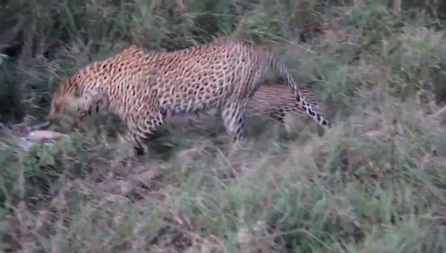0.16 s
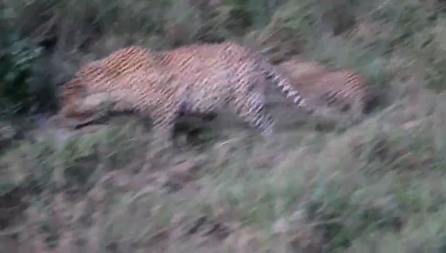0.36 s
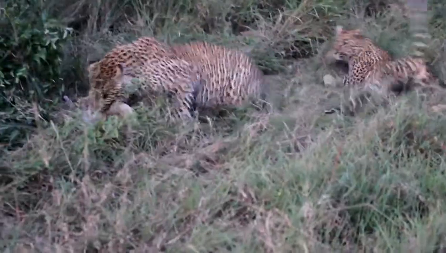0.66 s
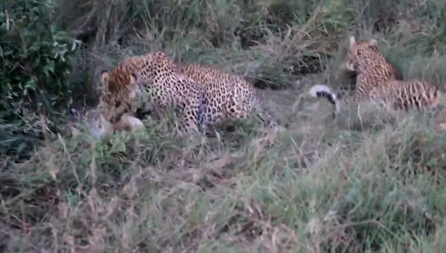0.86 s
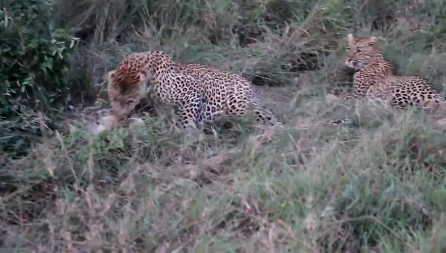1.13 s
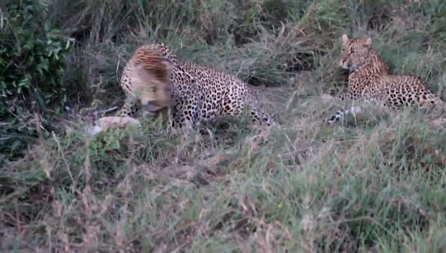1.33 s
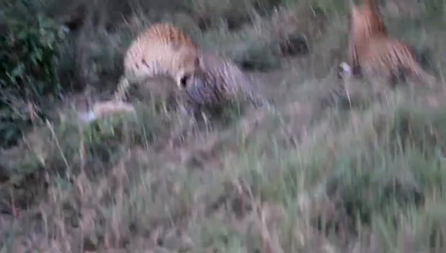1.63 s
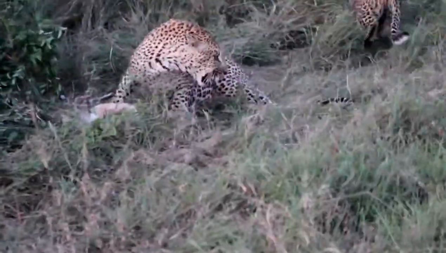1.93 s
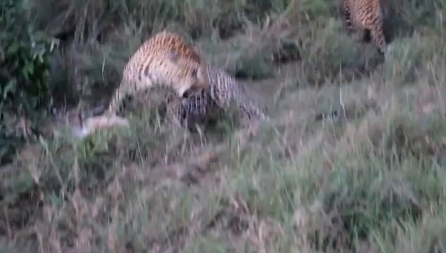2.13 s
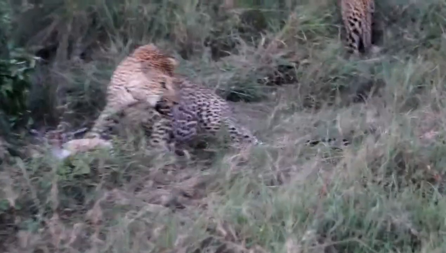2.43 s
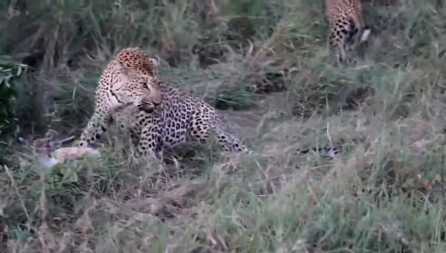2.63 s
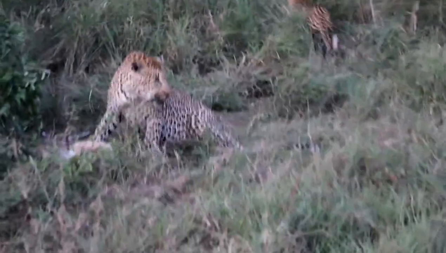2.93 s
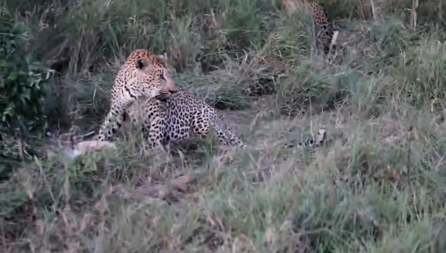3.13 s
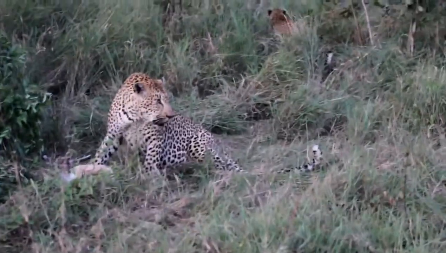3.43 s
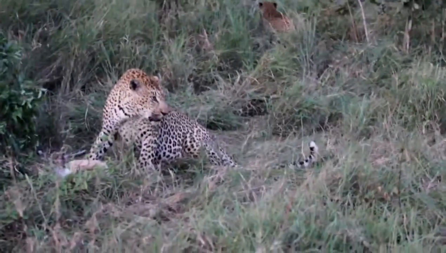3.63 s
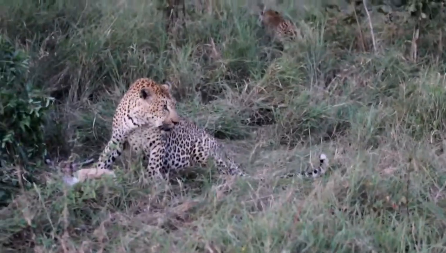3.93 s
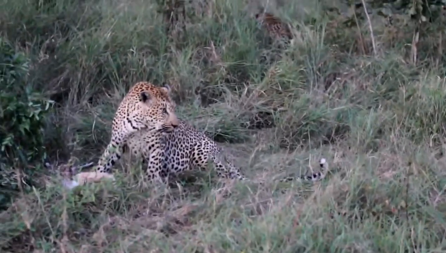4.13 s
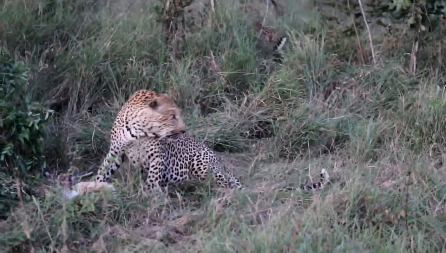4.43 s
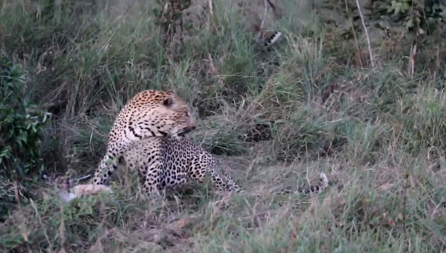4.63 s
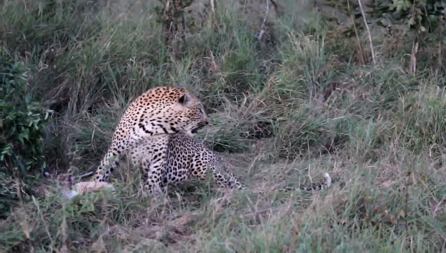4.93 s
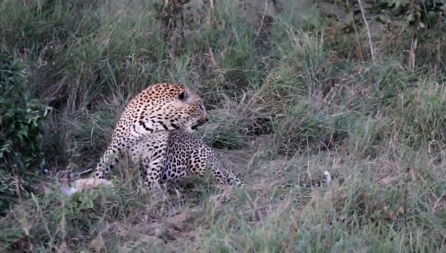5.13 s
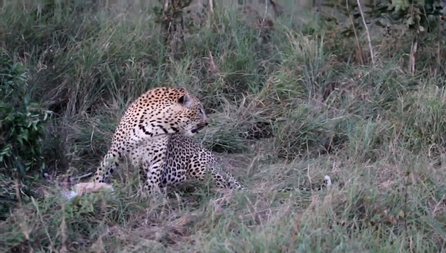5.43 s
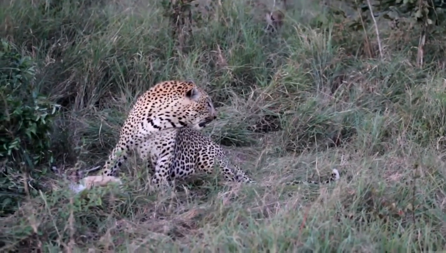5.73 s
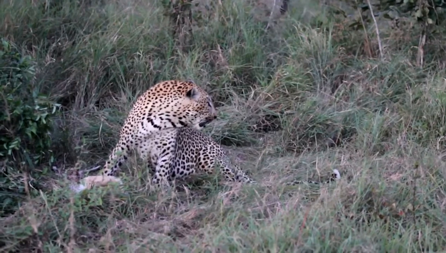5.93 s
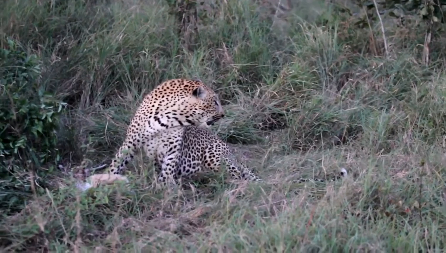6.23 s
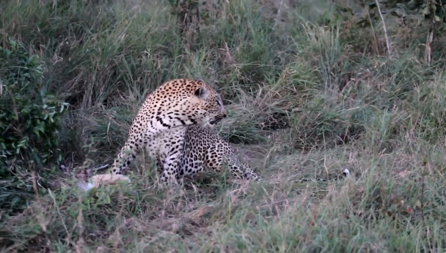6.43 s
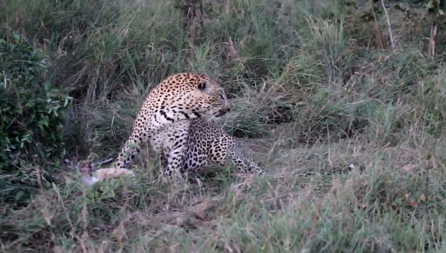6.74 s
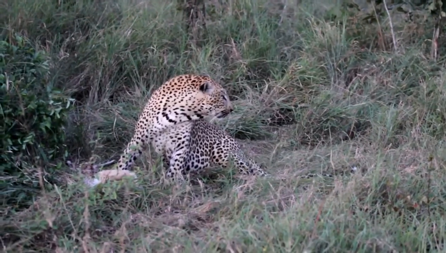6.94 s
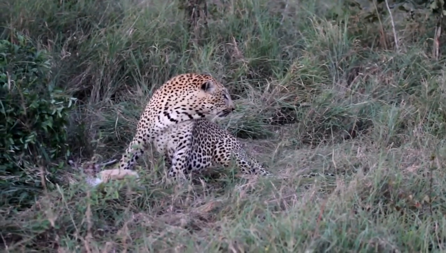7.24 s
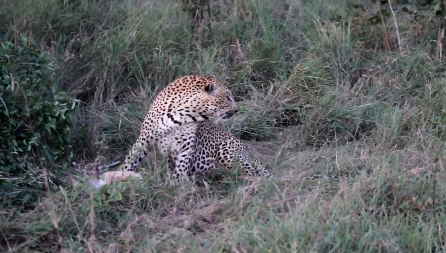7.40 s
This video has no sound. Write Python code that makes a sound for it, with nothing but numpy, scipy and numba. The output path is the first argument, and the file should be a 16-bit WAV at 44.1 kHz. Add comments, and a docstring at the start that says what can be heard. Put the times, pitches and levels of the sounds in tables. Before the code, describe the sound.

Outdoors in long grass, big cats clash with a quick run of loud snarls, spitting hisses and chesty growls. The outburst soon eases into low, throaty rattles with pauses between them, fading until they stop. Grass swishes softly as the animals move, and several dry stalks crack toward the end, leaving only faint open air.

```python
"""Leopards fighting in long grass

Two leopards growl and snarl at each other, then one grumbles on in slow, fading rattles. Slack vocal
folds slap shut tens of times a second: each slap booms in the chest and rasps through the mouth. In
the snarls the folds also flutter and air hisses past the teeth. Grass rustles, a few dry stalks snap
and one faint chirp sounds; the bushes add a short, dull echo."""
import sys
import numpy as np
from scipy import signal
from scipy.fft import rfft, irfft, next_fast_len
from scipy.io import wavfile
from scipy.ndimage import uniform_filter1d, map_coordinates
from numba import njit

SR = 44100
rng = np.random.default_rng(int(sys.argv[2]) if len(sys.argv) > 2 else 0)


def to_wav(s):
    """Save 16-bit WAV."""
    ch = np.atleast_2d(s).T  # columns
    pcm = np.round(np.clip(ch, -1, 1) * 32767)  # PCM
    wavfile.write(sys.argv[1], SR, pcm.astype(np.int16))


N = 333748
TIME = np.arange(N) / SR
TOP_HZ = 15900
SNARL_ATTACK_S, SNARL_RELEASE_S = 0.013, 0.026
FLUTTER, ROAR, HISS = 2, 3, 4  # level columns of the snarls in forced_air()

# the throat, slack in the fight and narrowed for the grumbling:
# (time [s], chest resonance [Hz], pharynx resonance [Hz])
THROAT = [(.15, 114, 473), (.3, 110, 262), (.39, 111, 380), (.5, 127, 333), (.65, 141, 257),
          (1.05, 105, 260), (1.28, 140, 230), (1.52, 123, 445), (1.85, 111, 310), (2.08, 119, 267),
          (2.24, 114, 399), (2.45, 101, 414), (2.72, 163.6, 428), (3.5, 150.6, 316), (3.85, 159.7, 417),
          (4.9, 171, 450)]
# hard slaps of the folds that stand out alone: (time [s], boom [dB], clack [dB])
LONE_SLAPS = [(.303, -29, -26), (.486, -38, -16), (.513, -29, -15.5), (0.909, -26.5, -31),
              (1.213, -30.5, -33), (1.786, -30, -33), (1.832, -40, -19.5), (1.871, -33.5, -19.5),
              (2.076, -44, -21.5), (2.704, -44, -24.5), (3.746, -45, -25.5), (4.948, -35, -26.5)]


def undb(db):
    return 10 ** (np.asarray(db) / 20)


def unit(x):
    return x / np.std(x)


def noise():
    return rng.standard_normal(N)


def track(table, column):
    """One column of an automation table at every sample."""
    rows = np.array(table)
    return np.interp(TIME, rows[:, 0], rows[:, column])


def walk(per_s):
    """Smooth random drift with a spread of 1."""
    hold = int(SR / per_s)
    steps = np.repeat(rng.standard_normal(N // hold + 1), hold)
    return unit(uniform_filter1d(uniform_filter1d(steps, hold), hold)[:N])


def colour(x, points):
    """EQ a sound through (frequency [Hz], level [dB]) points, at rms 1."""
    hz, db = np.transpose(points)
    size = next_fast_len(N, real=True)
    bins = np.maximum(np.fft.rfftfreq(size, 1 / SR), 1)
    gain = undb(np.interp(np.log(bins), np.log(hz), db))
    return unit(irfft(rfft(x, size) * gain, size)[:N])


def cut(x, hz, kind, order=2):
    return signal.sosfilt(signal.butter(order, hz, kind, fs=SR, output="sos"), x)


def strikes(times, db):
    """One impulse for each event."""
    out = np.zeros(N)
    np.add.at(out, np.clip((times * SR).astype(int), 0, N - 1), undb(db))
    return out


def fade(x, seconds):
    """Each impulse becomes an exponential decay."""
    return signal.lfilter([1], [1, -np.exp(-1 / (seconds * SR))], x)


def swell(middle_s, half_width_s):
    """A bell-shaped envelope."""
    return np.exp(-np.minimum(((TIME - middle_s) / half_width_s) ** 2, 20))


@njit
def ring(x, hz, width):
    """A resonance whose centre moves; an impulse of 1 rings with amplitude 1."""
    out, z, pole = np.empty(len(x), np.complex128), 0j, 0j
    for i in range(len(x)):
        if i % 16 == 0:
            pole = np.exp(np.pi * (2j * hz[i] - width) / SR)
        z = z * pole + x[i] + 1e-18
        out[i] = z
    return out


def formant(x, hz, width):
    """Band-pass with gain 1 at its moving centre."""
    return ring(x, hz, float(width)).real * 2 * np.pi * width / SR


def still_air():
    """A quiet, bass-heavy bed of outdoor air."""
    # tone of the air: (frequency [Hz], level [dB])
    air_eq = [(20, -56), (47, 1), (70, 1.5), (100, -5.5), (400, -13.5), (1500, -14.5), (16000, -27)]
    return undb(-57) * colour(noise(), air_eq)


def grass(grain_db=3.0):
    """Countless tiny scrapes merge into a high rustle that swells as the cats move."""
    # tone of the rustle: (frequency [Hz], level [dB])
    rustle_eq = [(300, -2), (1600, -1.5), (7000, -4.5), (12500, 0.5), (14500, -1.5), (16000, -11.5)]
    # the rustle between moves dies down as the cats settle: (time [s], level [dB])
    stirring = [(6.55, -53.5), (6.95, -59.5), (7.4, -63)]
    # moves through the grass: (middle [s], half width [s], level [dB])
    swishes = [(0.2, 0.046, -42.5), (0.55, 0.18, -40), (1.78, 0.53, -47), (2.42, 0.23, -51),
               (3.202, 0.28, -53.5), (4.26, 0.055, -50.5), (5.0, 0.36, -49.5), (5.328, 0.015, -45),
               (7.17, 0.067, -52)]
    power = undb(track(stirring, 1)) ** 2
    for middle, half_width, db in swishes:
        power += undb(db) ** 2 * swell(middle, half_width)
    grains = noise() * undb(grain_db * np.minimum(rng.exponential(size=N), 6))
    flicker = undb(1.1 * walk(25) + .8 * walk(7))
    return undb(-0.5) * colour(grains, rustle_eq) * np.sqrt(power) * flicker


def chirp(middle_s=4.785, half_width_s=.02, hz=3680, db=-48):
    """One faint, raspy chirp, perhaps a small bird far off."""
    band = colour(noise(), [(hz * .8, -30), (hz, 0), (hz * 1.2, -30)])
    return undb(db) * swell(middle_s, half_width_s) * band


def stalks():
    """A stalk snaps, then the blades around it crunch in a brief spray of tiny cracks."""
    # dry snaps, duller where the grass covers them: (time [s], level [dB], low-pass [Hz])
    snaps = [(4.568, -23.5, 5000), (5.093, -23, 9380), (6.684, -29, 14500), (7.154, -29.5, 14500),
             (7.249, -26.5, 11000), (7.269, -24.5, 15500)]
    crack = noise()
    spray = unit(noise() * undb(2 * np.clip(walk(400), -2, 2)))
    out = 0
    for time, db, top_hz in snaps:
        snap = strikes(np.array([time]), db)
        sound = undb(-4.5) * crack * fade(snap, .0014) + undb(-15) * spray * fade(snap, .02)
        out = out + cut(sound, top_hz, "low")
    return cut(out, 2000, "high", order=1)


def bushes(x, t60_s=0.17, predelay_s=.008, wet_db=-16):
    """The bank and bushes scatter a short, dull echo."""
    t = TIME[:SR // 2]
    tail = cut(noise()[:len(t)], 4500, "low") * undb(-60 * t / t60_s) * (t > predelay_s)
    tail = cut(tail, 164, "high")
    return x + undb(wet_db) * signal.fftconvolve(x, tail / np.linalg.norm(tail))[:N]


def steady(x):
    """Even out the power over about 30 ms: the lungs keep up their pressure whatever the folds do."""
    power = uniform_filter1d(uniform_filter1d(x ** 2, SR // 33), SR // 66)
    return x / np.sqrt(power + np.var(x) / 20)


def soften(x, rise_s=.0045):
    """Round the attack of each puff: turbulence takes time to build as the folds part."""
    return uniform_filter1d(x, int(rise_s * SR))


def arch(share, strongest, fade_db):
    """Effort in dB along one call, down by fade_db one call length from the strongest point."""
    return -fade_db * (share - strongest) ** 2


def forced_air(column):
    """Envelope of flutter, roar or hiss: each snarl has a quick attack, an arch and a release."""
    # snarls, each one push of air: (start [s], length [s], flutter [dB], roar [dB], hiss [dB],
    # strongest point [0-1], fade one length away [dB])
    snarls = [(-.02, 0.25, -33, -39.5, -46, 0.52, 23), (0.258, 0.16, -29.5, -36.5, -43.5, 0.55, 13),
              (0.4, 0.14, -25.5, -25, -67, 0.8, 11), (0.598, 0.085, -27.5, -23.5, -30, 0.7, 20),
              (0.69, 0.14, -34, -27.5, -39.5, 0.02, 6), (0.874, 0.051, -39.5, -36.5, -72, 0.7, 2),
              (0.95, 0.2, -29.5, -28, -36.5, 0.54, 19), (1.222, 0.15, -37, -29.5, -35, 0.4, 11),
              (1.386, 0.4, -31.5, -33.5, -44.5, 0.1, 35), (1.827, 0.19, -35.5, -39, -55, 0.06, 13),
              (2.029, 0.075, -35, -32, -53, 0.6, 11), (2.175, 0.089, -36, -33.5, -43.5, 0.67, 5),
              (2.252, 0.37, -47.5, -47.5, -47.5, 0.04, 17.5), (2.608, 0.37, -51.5, -50, -56.5, 0.02, 13),
              (3.222, 0.039, -36, -42, -71, 0.64, 18), (3.306, 0.31, -45.5, -48, -58, 1, 13.5),
              (3.722, 0.303, -52, -46, -68, 0.02, 5.5), (4.887, 0.19, -57, -45, -56, 0.54, 12)]
    gain = np.full(N, 1e-4)
    for row in snarls:
        start, length, *_, strongest, fade_db = row
        span = slice(max(int(start * SR), 0), int((start + length + SNARL_RELEASE_S) * SR))
        t = TIME[span] - start
        edges = np.clip(np.minimum(t / SNARL_ATTACK_S, 1 - (t - length) / SNARL_RELEASE_S), 0, 1)
        effort_db = arch(np.minimum(t / length, 1), strongest, fade_db)
        gain[span] += edges * undb(row[column] + effort_db)
    return gain


def flutter(typical_hz=120, scatter_db=4):
    """Chaotic pulses of the folds under pressure, at rms 1."""
    gap_chance, level_chance = rng.standard_normal((N // 200, 2)).T
    times = np.cumsum(np.exp(.5 * gap_chance) / typical_hz)
    inside = times < N / SR
    return unit(strikes(times[inside], scatter_db * np.clip(level_chance[inside], -2, 2)))


def gurgle():
    """Tongue and saliva let a resonance stand out for a moment, then choke it."""
    return undb(5 * np.clip(walk(30), -2, 1.4) - .5)


def rattle(x, span_hz=(720, 8340), bands=11, depth_db=5.5, per_s=130):
    """Saliva flaps in the throat: each band spurts and chokes on its own, within milliseconds."""
    size = next_fast_len(N, real=True)
    spectrum, hz = rfft(x, size), np.fft.rfftfreq(size, 1 / SR)
    centres = np.geomspace(*span_hz, num=bands)
    out = 0
    for weights in np.eye(bands):
        band = irfft(spectrum * np.interp(hz, centres, weights), size)[:N]
        spurts = undb(depth_db * np.clip(walk(per_s), -2, 1.3))
        out = out + band * spurts / np.sqrt(np.mean(spurts ** 2))
    return out


def teeth(air, edge_width_hz=1300, edge_db=-6):
    """Spitting hiss: brief, scattered resonances, and a bright edge that moves with the lips."""
    # tone of air past the teeth: (frequency [Hz], level [dB])
    hiss_eq = [(1500, -52), (2400, -9.5), (2900, -1.5), (3800, 0), (5400, -6.5), (7000, -3.5),
               (10000, -7.5), (13000, 3.5), (16000, -18)]
    # the edge rises as the lips draw back and sinks as they relax: (time [s], centre [Hz])
    lips = [(.5, 3230), (.67, 4030), (.76, 2420), (1.17, 2700), (1.25, 5750), (1.4, 4020), (2.1, 3400),
            (2.23, 5830), (2.32, 3750)]
    centres = np.geomspace(2500, 9500, num=10) * (1 + .02 * rng.standard_normal(10))
    spit = sum(gurgle() * formant(air, hz * (1 + .025 * walk(18)), hz / 28) for hz in centres)
    edge_hz = track(lips, 1)
    edge = formant(formant(air, edge_hz, edge_width_hz), edge_hz, edge_width_hz)
    return colour(unit(spit) + .3 * unit(air), hiss_eq) + undb(edge_db) * unit(edge)


def throat_comb(x, round_trip_s=.0024, echo_gain=.5, taps=4):
    """The hiss runs up and down the throat, which combs it into ridges that shift with the tongue."""
    delay = round_trip_s * SR * (1 + .02 * walk(10))
    echoes = (echo_gain ** k * map_coordinates(x, [np.arange(N) - k * delay], order=1)
              for k in range(taps))
    return sum(echoes) * np.sqrt(1 - echo_gain ** 2)


def held_snarl(start_s=1.83, end_s=2.13, width_hz=110):
    """With the jaws held still, rough air keeps a set of narrow resonances ringing."""
    # resonances of the held mouth: (centre [Hz], level [dB])
    held_modes = [(785, -48), (1545, -46), (1950, -46), (2320, -50), (3350, -52), (3715, -46)]
    envelope = np.clip(np.minimum(TIME - start_s, end_s - TIME) / SNARL_RELEASE_S, 0, 1)
    air = flutter() + noise()
    tones = 0
    for hz, db in held_modes:
        centre = hz * (1 + .006 * walk(10))
        tone = formant(formant(air, centre, width_hz), centre, width_hz)
        tones = tones + undb(db) * gurgle() * steady(tone)
    return envelope * tones


def clacks(hz=900, width_hz=145.0):
    """A hard, single closure of the folds: a sharp clack that dies within a few cycles."""
    times, _, clack_db = np.transpose(LONE_SLAPS)
    clack = ring(strikes(times, clack_db), hz * (1 + .08 * walk(10)), width_hz)
    return cut(clack.real, hz / 2, "high")


def narrowing():
    """How far the throat has narrowed, 0-1: it raises the chest resonance and lowers the high ones."""
    hz = track(THROAT, 1)
    return (hz - hz.min()) / np.ptp(hz)


def mouth(x):
    """Pharynx and mouth shape the vowel: two formants ride the jaw, the high ones waver and gurgle."""
    # the jaw opens and closes: (time [s], lower formant [Hz], upper formant [Hz],
    # upper formant gain [dB], high formants gain [dB])
    jaw = [(.15, 870, 1064, -1, 5), (.5, 785, 1085, -4.5, -2), (.66, 1030, 1154, 4, 0),
           (.76, 984, 1260, -8.5, -2.5), (.97, 904, 1030, 1, 0), (1.12, 764, 1020, 2, -3.5),
           (1.23, 890, 910, -13, 0), (1.29, 944, 1040, 5, -11), (1.35, 927, 1090, -2.5, 3.5),
           (1.56, 870, 1136, 5.5, 3), (1.85, 830, 960, -6, 3.5), (2.08, 760, 930, -11, 5.5),
           (2.25, 880, 1100, 5.5, 1), (2.4, 890, 1084, 16.5, -4), (2.7, 830, 1115, 6, 0.5),
           (2.95, 720, 1113, 7, -1), (3.55, 667, 870, 3, 2.5), (3.87, 700, 1123, 4, 4),
           (4.95, 796, 1036, -1, -4.5), (5.3, 770, 1140, 1.5, 1.5)]
    # the pharynx, lower and upper formants: (width [Hz], level [dB])
    main_modes = [(59.7, -3), (82, 5.5), (45.6, 1.5)]
    # high formants with a slack throat: (centre [Hz], width [Hz], level [dB], gain when narrowed [dB])
    high_modes = [(1427, 61, -8.5, 2), (1732, 62, -6, 1.5), (1924, 87, -2.5, -8), (2298, 50, -16, 11),
                  (2610, 142, -18, 12), (3110, 120, -23.5, 7.5), (3705, 54, -8.5, -4.5),
                  (4300, 44, -23, 13)]
    centres = track(THROAT, 2), track(jaw, 1), track(jaw, 2)
    pharynx, lower, upper = (undb(db) * formant(x, hz, width)
                             for hz, (width, db) in zip(centres, main_modes))
    narrow = narrowing()
    tuning = (1 - 0.024 * narrow) * (1 + 0.018 * walk(4.08))
    highs = 0
    for hz, width, db, narrowed_db in high_modes:
        centre = hz * tuning * (1 + .01 * walk(9))
        highs = highs + undb(db + narrowed_db * narrow) * gurgle() * formant(x, centre, width)
    # in the fiercest snarls the jaws gape and the resonances spread into one broad roar
    force = forced_air(ROAR)
    gape = undb(-3.5) * force / force.max() * formant(x, track(jaw, 2), width=230)
    vowel = cut(lower + upper * undb(track(jaw, 3)) + gape, 2040, "low", order=1)
    front = cut(vowel + highs * undb(track(jaw, 4)), 654, "high", order=4)
    back = cut(pharynx * undb(4.5 - 3.6 * narrow), 560, "low", order=4)
    return back + cut(front, 6600, "low")


def chest(push, slack_width_hz=46.0, narrow_width_hz=27.0, thud_hz=66.0, thud_width_hz=92.0):
    """The lowest resonance booms for several cycles after each slap, over a dull chest-wall thud."""
    narrow = narrowing()
    # air leaks through the folds around each slap, so the booms swell and run together
    drive = push + undb(18) * noise() * uniform_filter1d(push, SR // 40)
    hz = track(THROAT, 1) * (1 + 0.057 * walk(30))
    # a slack, open throat damps the ring; a narrowed one sustains it
    damped = undb(7.5) * ring(drive * (1 - narrow), hz, slack_width_hz).imag
    sustained = undb(8.5) * ring(drive * narrow, hz, narrow_width_hz).imag
    boom = formant(damped + sustained, hz, width=130)  # builds up over its first cycles
    thud = ring(push, np.full(N, thud_hz), thud_width_hz).imag * undb(-2.5 + 9.3 * narrow)
    return cut(cut(boom + thud, 78.5, "high", order=3), 144, "low")


def slaps(jitter_s=0.00052, scatter_db=1.6, accent_db=2.5, rasp_fade_ratio=1.4):
    """The folds slap shut in runs, most of them slowing down: gives times, boom dB and rasp dB."""
    # growls, each one run of slaps: (start [s], length [s], opening rate [1/s], gap growth [share],
    # boom [dB], rasp [dB], strongest point [0-1], fade one length away [dB])
    growls = [(0.031, 0.19, 33.6, 0.03, -23.5, -32.5, 0.41, 31),
              (0.301, 0.1, 33, 0.33, -41, -25.5, 0.4, -2), (0.432, 0.14, 35.7, 0.054, -30, -25, 0.7, 1),
              (0.612, 0.061, 50, 0, -29, -25.5, 0.66, -7), (0.772, 0.078, 35, 0.022, -23, -39, 1, 8),
              (0.958, 0.17, 46, 0, -28.5, -20, 0.56, 9), (1.241, 0.16, 39.6, 0.077, -32, -25, 0.24, 18),
              (1.408, 0.273, 35.4, 0.029, -25, -24.5, 0.49, 10),
              (2.044, 0.061, 34.7, 0.014, -29, -29, 0.68, 21), (2.19, 0.067, 30, 0, -22, -25, 0.57, 19),
              (2.287, 0.34, 25, 0.046, -30, -36, 0.09, 20),
              (2.622, 0.22, 25.6, 0.064, -28.5, -30, 0.49, 44), (2.894, 0.2, 20, .03, -38, -47.5, 0.44, 13),
              (3.247, 0.04, 50.7, 0, -29, -33, 0.64, 10), (3.391, 0.24, 35.7, 0.0047, -33, -43, 0.98, 6.5),
              (3.744, 0.31, 26.6, 0.056, -27.5, -30.5, 0.15, 8.5),
              (4.118, 0.15, 16, 0.17, -36, -45.5, 0.04, 16), (4.762, .05, 31, 0, -38, -44.5, 0.7, 3),
              (4.91, 0.14, 28.2, 0.024, -25, -31, 0.15, 14), (5.072, .11, 21.4, 0.019, -31, -38.5, 0.3, 4),
              (5.213, 0.33, 21.3, 0.12, -31, -36, 0.09, 16), (5.96, 0.053, 29, 0, -35.5, -42.5, 1, 12),
              (6.119, 0.099, 35, 0.0035, -32, -32, 0.45, 23), (6.356, 0.064, 21, 0, -35.5, -42, 0, 6)]
    runs, number = [], np.arange(20)
    for start, length, rate, slowing, boom_db, rasp_db, strongest, fade_db in growls:
        late, boom_chance, rasp_chance = np.clip(rng.standard_normal((3, len(number))), -2, 2)
        gaps = (1 + slowing) ** number / rate
        since = np.cumsum(gaps) - gaps
        effort = arch(since / length, strongest, fade_db)
        accent = accent_db * (number == 0)  # pressure behind the closed folds hardens the first slap
        run = np.array([start + since + jitter_s * late,
                        boom_db + accent + effort + scatter_db * boom_chance,
                        rasp_db + accent + rasp_fade_ratio * effort + scatter_db * rasp_chance])
        runs.append(run[:, since < length])
    return np.hstack(runs)


def leopards(ragged_db=0.8, ragged_per_s=50):
    """Slaps boom in the chest and rasp in the mouth; flutter drives the snarls' rumble, roar and hiss."""
    times, boom_db, rasp_db = slaps()
    pulses = steady(flutter())
    gate = steady(soften(fade(pulses, 0.01)))
    # flutter fills the low throat with a rough rumble, strongest at the pharynx resonance
    low_throat = cut(cut(pulses, 86, "high"), 285, "low", order=4)
    pharynx = undb(1) * formant(pulses, track(THROAT, 2), width=30)
    rumble = undb(-4) * steady(low_throat + pharynx) * forced_air(FLUTTER)
    # each slap lets through a puff of air
    slap = strikes(times, rasp_db)
    puffs = noise() * soften(undb(13) * fade(slap, 0.0036) + undb(0.5) * fade(slap, 0.012))
    # the air of a snarl comes in uneven gulps
    ragged = undb(ragged_db * np.clip(walk(ragged_per_s), -2, 1.5))
    roar = ragged * forced_air(ROAR) * (undb(4.5) * pulses + undb(11.5) * gate * noise())
    breath = noise() * (gate + .55)  # some air leaks between the pulses
    hiss = ragged * forced_air(HISS) * teeth(breath)
    lone_times, lone_boom_db, _ = np.transpose(LONE_SLAPS)
    booms = chest(strikes(times, boom_db) + strikes(lone_times, lone_boom_db))
    voice = mouth(puffs + rattle(roar))
    return booms + rumble + voice + clacks() + undb(-1) * throat_comb(rattle(hiss))


def scene():
    """Cats, stalks and chirp echo off the bushes, over rustling grass and still air."""
    air = still_air()
    echoing = bushes(leopards() + held_snarl() + stalks() + chirp())
    return (echoing + grass() + air)[None]


def record(dry):
    """A steep low-pass trims the top of the treble."""
    return signal.sosfilt(signal.ellip(10, .2, 80, TOP_HZ, fs=SR, output="sos"), dry)


dry = scene()
out = record(dry)
to_wav(out)
```